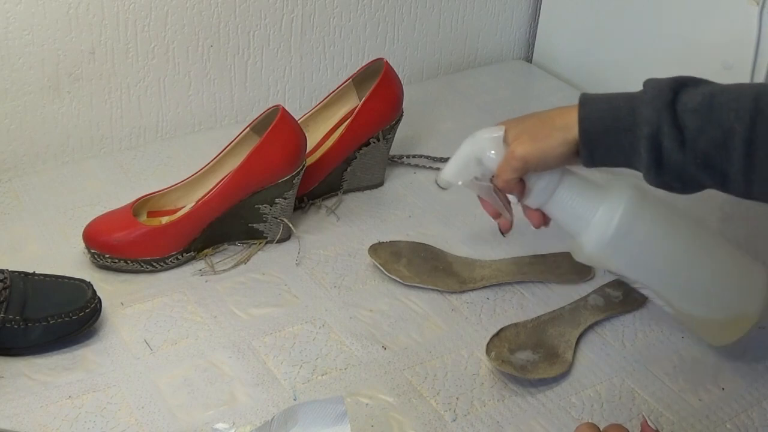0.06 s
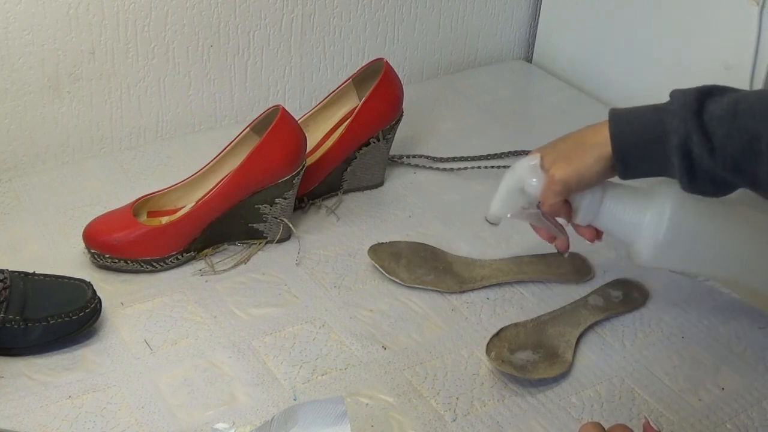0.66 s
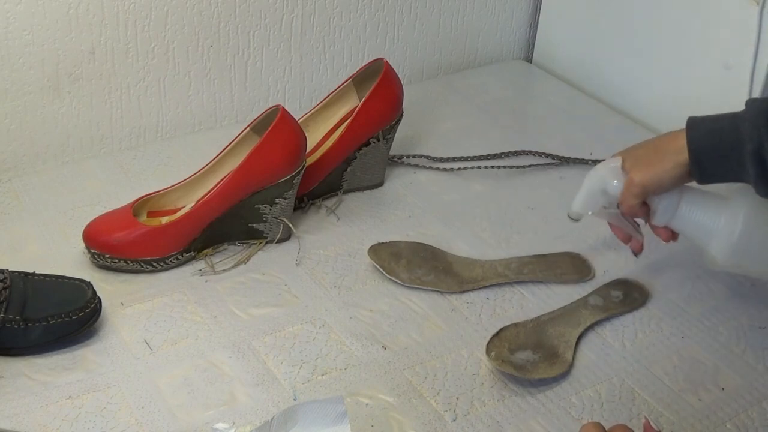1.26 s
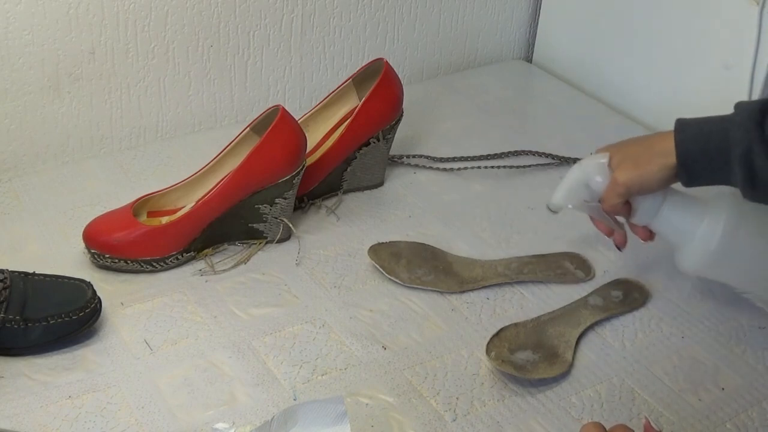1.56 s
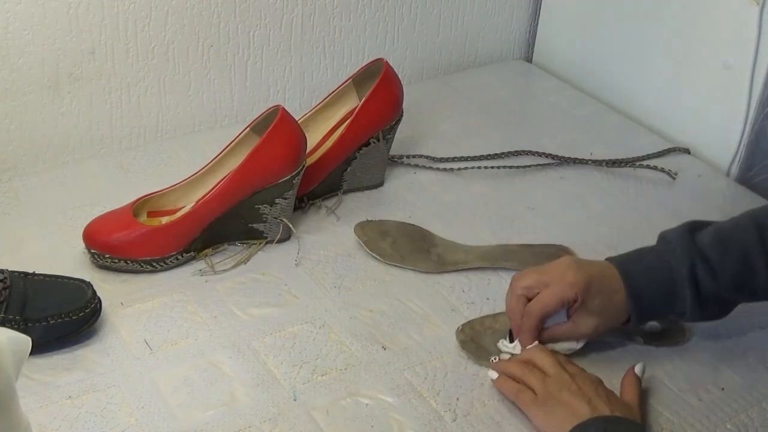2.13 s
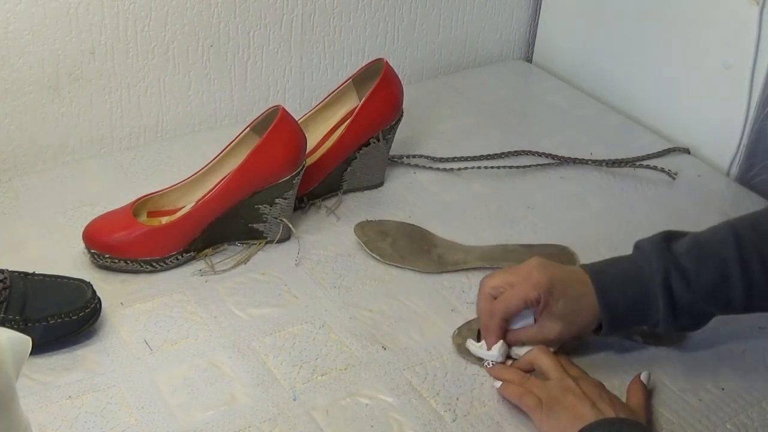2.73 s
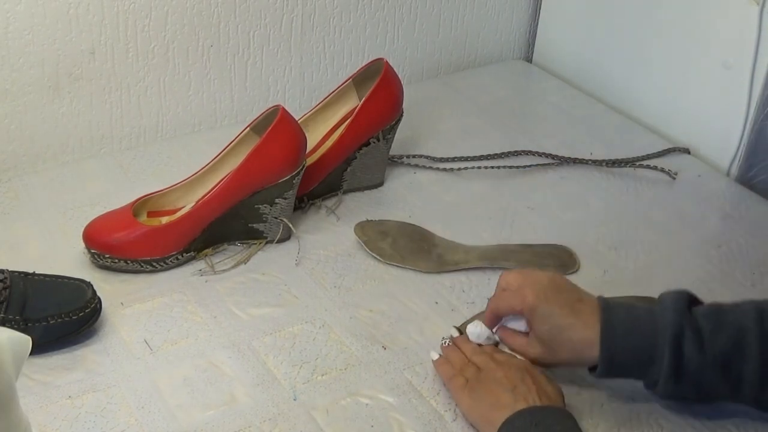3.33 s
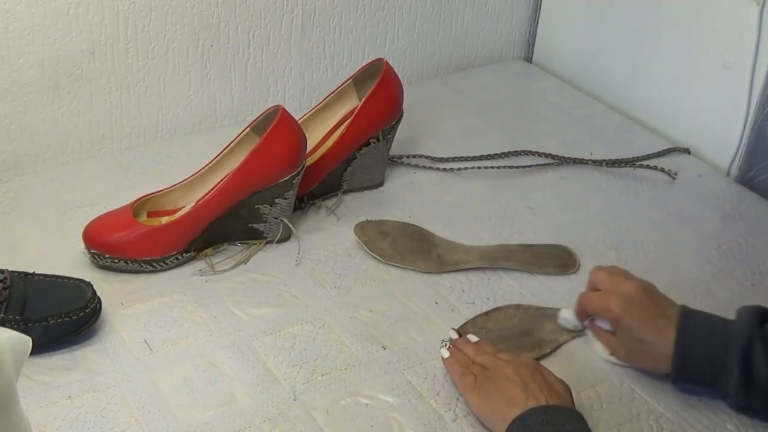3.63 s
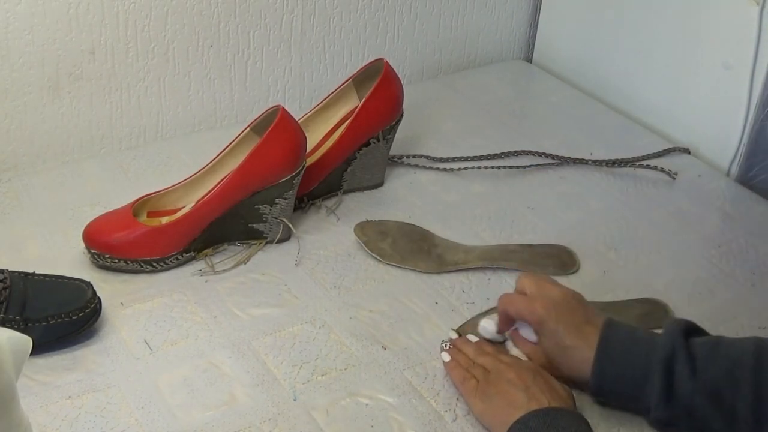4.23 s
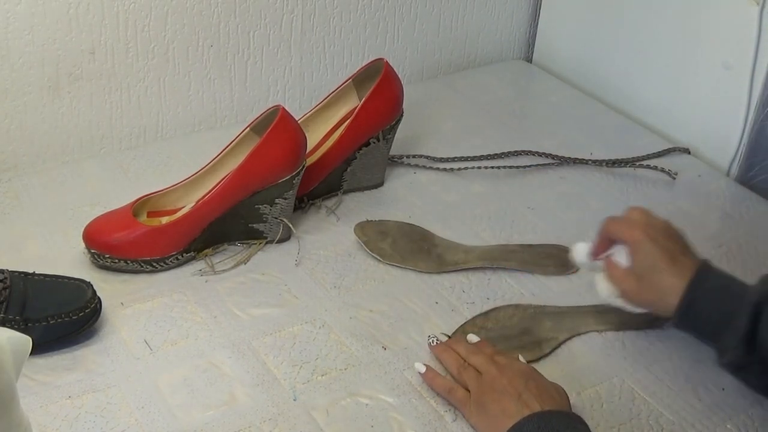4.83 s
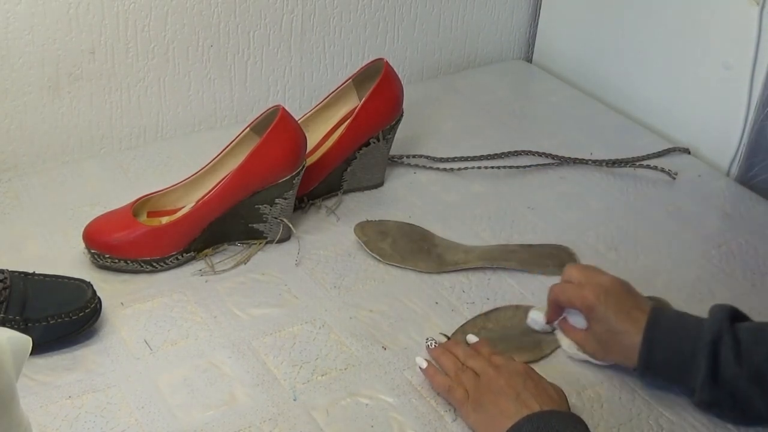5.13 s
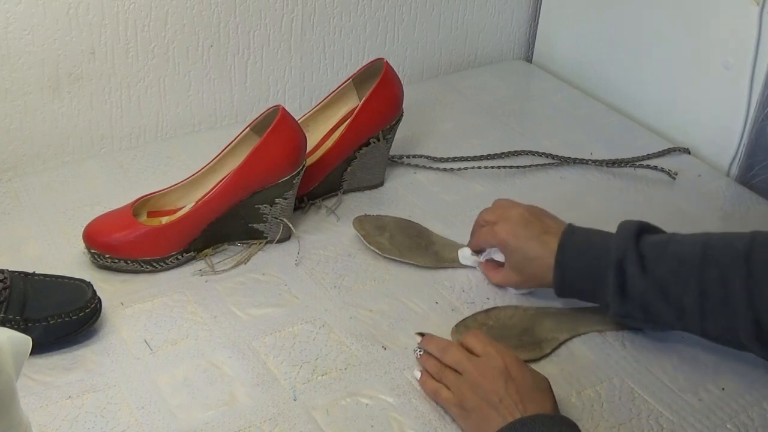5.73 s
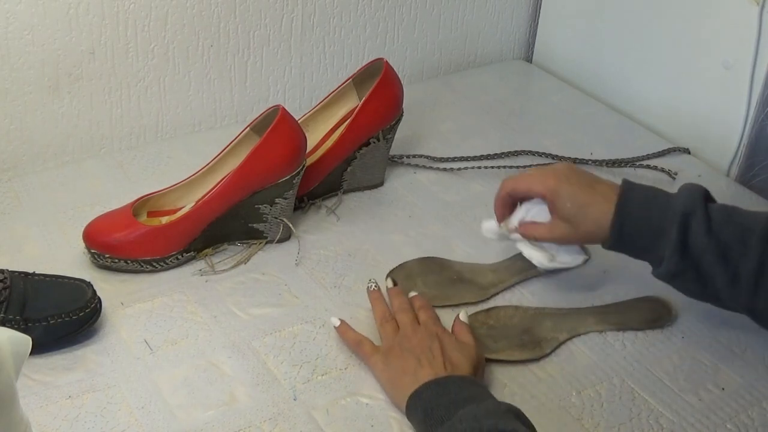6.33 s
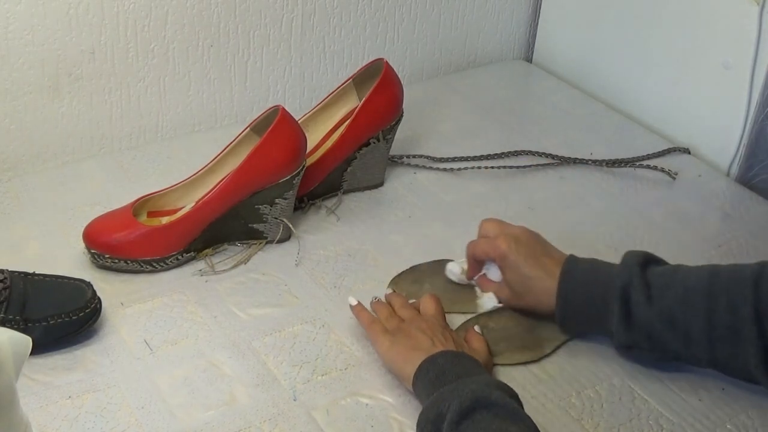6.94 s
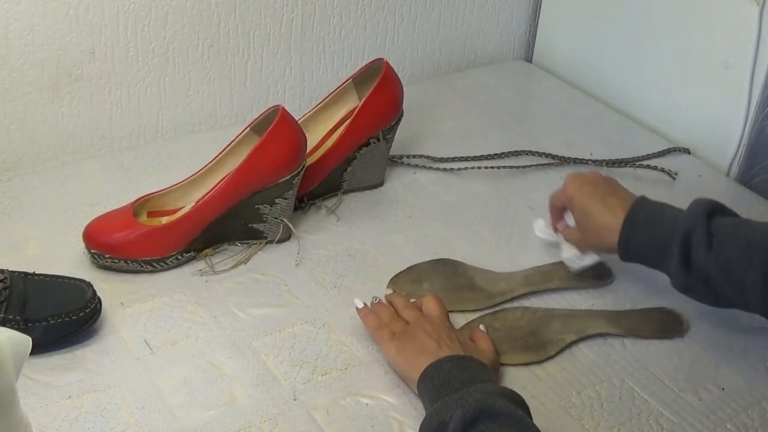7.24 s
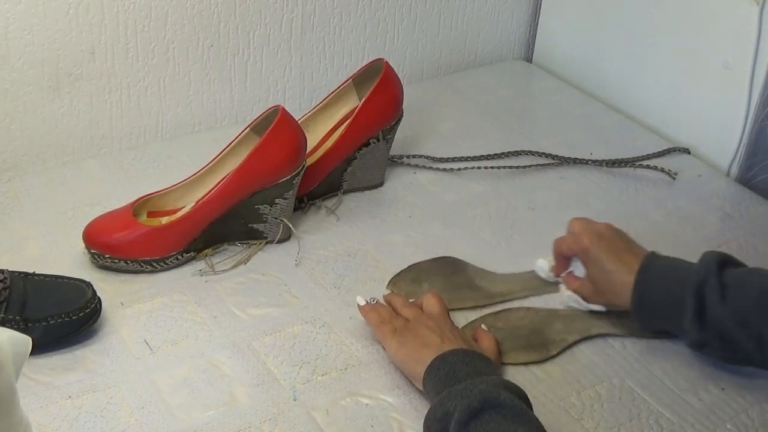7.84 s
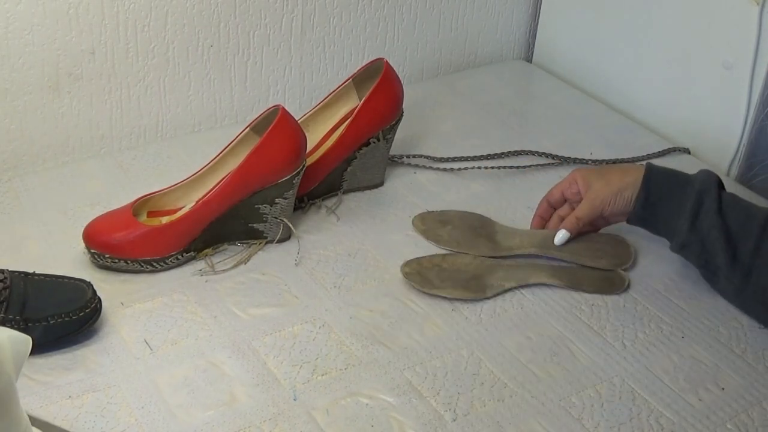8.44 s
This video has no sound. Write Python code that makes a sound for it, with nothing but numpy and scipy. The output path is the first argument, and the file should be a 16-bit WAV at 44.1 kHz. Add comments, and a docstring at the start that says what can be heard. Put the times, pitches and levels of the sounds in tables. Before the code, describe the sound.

Quick clicking, hissing squirts from a trigger bottle stop abruptly, followed by soft strokes of a cloth rubbing insoles.

```python
"""In a small, softly hushing room, a plastic trigger bottle is pumped quickly over two insoles on a table.
Each pull shakes the piston, ticks the valve and throws a hiss of mist; then the trigger snaps back.
At 1.8 s the spraying stops abruptly. A cloth is patted down on the insoles and wiped along them,
its fibres catching and letting go. At 7.9 s that stops too, and a fingernail nudges the insoles,
which slide with a faint squeak. A very faint, high pip repeats from start to end."""
import sys
import numpy as np
from scipy import signal
from scipy.fft import rfft, irfft, next_fast_len
from scipy.io import wavfile
from scipy.ndimage import uniform_filter1d, map_coordinates

SR = 44100
rng = np.random.default_rng(int(sys.argv[2]) if len(sys.argv) > 2 else 0)


def log_audio(samples):
    """Write samples as a 16-bit WAV file to the path given in sys.argv[1]."""
    # one column per channel
    frames = np.atleast_2d(samples).T
    # limit to full scale, then quantise
    limited = np.clip(frames, -1, 1)
    pcm = np.round(limited * 32767).astype(np.int16)
    wavfile.write(sys.argv[1], SR, pcm)


N = 382788
TIME = np.arange(N) / SR
RING_TIME = np.arange(SR // 3) / SR  # seconds since a hit
SWITCH_S = (1.8295, 7.937)  # spraying gives way to wiping; wiping stops

# tone of the room's hush (a "colour" says how strong each frequency is): f/Hz, level/dB
HUSH_COLOUR = [(15, -46), (25, -25), (64, -6.5), (161, -7), (309, -3.5), (344, -8), (641, -7), (887, -7.5),
               (1400, -12.5), (3430, -10.5), (3720, -27), (4030, -13.5), (16000, -24.5)]
# how long the room's echo takes to fade by 60 dB: f/Hz, fade/s
ROOM_FADE = [(100, 0.068), (500, 0.21), (2000, 0.28), (6000, 0.15), (14000, 0.049)]
# gain on the difference between left and right: f/Hz, level/dB
STEREO_WIDTH = [(60, -7.5), (300, 2), (700, 2.5), (1400, 2), (3300, -4), (6500, 1), (9800, 2), (12000, -29),
                (16000, -11)]

# small touches of nails, plastic and insoles: t/s, level/dB, f/Hz, fade/s
TAPS = [(1.739, -39.5, 2840, 0.014), (1.82, -30.5, 4330, 0.0029), (2.423, -38.5, 5160, 0.0041),
        (3.4537, -31.5, 5200, 0.00066), (4.1355, -34, 3860, 0.00082), (5.635, -29.5, 4170, 0.00053),
        (6.013, -45.5, 1130, 0.0033), (6.095, -55, 1040, 0.055), (6.616, -47, 4480, 0.0079),
        (7.489, -47, 6460, 0.018), (8.228, -39, 4400, 0.00047), (8.326, -47, 3370, 0.0013),
        (8.584, -61, 8500, .005)]
# loudness of the sliding insole: t/s, level/dB
SLIDE_LEVEL = [(8.33, -86), (8.38, -58), (8.41, -64), (8.46, -81), (8.53, -74), (8.6, -91)]
# tone of its scrape: f/Hz, level/dB
SLIDE_COLOUR = [(300, -4), (700, -8), (1500, -7), (3000, 2), (4500, -9), (9000, -27)]
# where the scrape rings: f/Hz, width/Hz, boost/dB
SLIDE_PEAKS = [(650, 200, 9), (2900, 300, 11)]
# its squeak: t/s, f/Hz, level/dB
SQUEAK = [(8.36, 2040, -85), (8.4, 2050, -61), (8.46, 2170, -69), (8.52, 2220, -69), (8.57, 2260, -87)]

# the hand lands or presses with the cloth: t/s, level/dB, hardness/dB
PATS = [(2.0903, -30.5, 1.5), (2.339, -45.5, 2), (2.878, -44.5, -6), (2.949, -47, 2.5), (3.263, -55, -21),
        (3.828, -51.5, -9), (4.14, -36.5, -1), (4.9938, -29.5, 3), (5.636, -51, -1), (5.662, -47.5, -5),
        (6.639, -46.5, -17), (6.679, -47.5, -10), (7.068, -53, -22), (7.18, -49.5, -21), (7.512, -36.5, -4),
        (7.553, -42.5, -1.5), (7.758, -52, -16)]
# tone of a pat: f/Hz, level/dB
PAT_COLOUR = [(60, -14), (500, -8), (1200, -14), (2000, -15.5), (3000, -16.5), (5000, -24.5), (12000, -45)]
# notes the table top rings at: f/Hz, level/dB, fade/s
TABLE_NOTES = [(88.6, -2, 0.21), (119, -4.5, 0.2), (175, -10.5, 0.25), (214.4, -9, 0.27),
               (261, -2.5, 0.091), (294.5, -3, 0.14), (406, -2.5, 0.12), (471, -7.5, 0.15),
               (585, 8.5, 0.066), (705, -5.5, 0.13), (883, -1.5, 0.096), (1208, -6, 0.11)]
# wipes: start/s, stop/s, speeding up/s, slowing down/s, level/dB, easing off/(dB per s), drag/dB
WIPES = [(2.125, 2.418, 0.21, 0.17, -33, 0, -55.5), (2.732, 2.921, .12, 0.14, -34, 0, -52),
         (3.392, 3.838, 0.16, 0.071, -36, 6.5, -58), (4.153, 4.446, 0.15, 0.22, -35.5, 0, -54),
         (4.38, 4.709, 0.15, 0.073, -37.5, 2, -61), (4.984, 5.387, 0.13, 0.055, -38.5, 28, -66),
         (6.701, 7.265, 0.28, 0.095, -36.5, 33.5, -62), (7.504, 8.0, 0.16, .06, -37, 7, -65)]
# light brushes of cloth and sleeve: middle t/s, half length/s, level/dB
BRUSHES = [(1.87, .04, -51), (1.914, 0.014, -45.5), (1.996, 0.035, -50), (2.085, 0.026, -43),
           (2.668, 0.012, -48), (2.933, 0.013, -44.5), (3.047, 0.19, -53.5), (3.336, 0.018, -45.5),
           (3.927, .03, -49), (4.015, 0.017, -47.5), (4.075, .015, -52), (4.142, 0.0086, -40),
           (4.76, 0.027, -58.5), (5.435, 0.031, -50.5), (5.504, 0.026, -46), (5.74, 0.11, -50),
           (5.958, 0.082, -54.5), (6.144, 0.068, -50.5), (6.42, 0.098, -59), (6.62, 0.016, -47),
           (6.786, 0.022, -45), (7.498, .014, -48)]
# tone of the rubbing cloth: f/Hz, level/dB
CLOTH_COLOUR = [(120, -40), (200, -13), (294, -12.5), (347, -31), (465, -13.5), (601, -5), (647, -8),
                (899, -3), (968, -3), (1650, -3.5), (2330, -3.5), (4270, 1), (8580, -5.5), (11500, -13),
                (16000, -36)]
# where the rubbed insole rings: f/Hz, width/Hz, boost/dB
INSOLE_PEAKS = [(1680, 400, 1), (3050, 860, 2.5)]
# rumble of the hand dragging on the table: f/Hz, level/dB
DRAG_COLOUR = [(30, -14), (60, -8.5), (95, 0), (140, -11.5), (260, -11), (500, -12), (1200, -25.5)]

# trigger pulls: start t/s, piston hits bottom t/s, mist level/dB, knock level/dB
PULLS = [(-.14, -.083, -27.5, -30), (0.1659, 0.2233, -29, -25), (0.468, 0.527, -29.5, -23.5),
         (0.76, .818, -29, -25), (1.034, 1.111, -29.5, -24.5), (1.307, 1.385, -30, -26.5),
         (1.585, 1.6222, -30, -23.5)]
# the trigger snaps back after each pull: t/s, level/dB
SNAPS = [(0.025, -20), (0.3604, -20), (0.6567, -18.5), (0.9399, -16.5), (1.2056, -17.5), (1.4748, -16.5),
         (1.768, -20.5)]
# the valve shuts and bounces once: t/s after the snap, level/dB
VALVE_SHUTS = [(0.0118, -24.5), (0.031, -28.5)]
# mist at full pressure: f/Hz, level/dB
FULL_MIST = [(60, -63), (115, 6), (180, -14.5), (300, 0.5), (700, -24), (1400, -12), (2700, -11.5),
             (4400, -4), (6000, -3.5), (8200, 0), (10000, -1), (12500, -8.5), (16000, -12.5)]
# mist as the pressure sags: f/Hz, level/dB
LATE_MIST = [(60, -53), (115, -28), (400, -14.5), (1400, -15), (2700, -7), (4500, -2), (6000, -1.5),
             (8200, 0.5), (11000, -3), (12500, -8.5), (16000, -16)]
# where the nozzle rings: f/Hz, width/Hz, boost/dB
NOZZLE_PEAKS = [(4430, 120, 7.5), (8340, 170, 2.5), (9750, 500, 1.5), (10900, 170, -3)]
# notes of the half-full bottle and its spray head: f/Hz, level/dB, fade/s
BOTTLE_NOTES = [(106.7, -26, 0.44), (284, -8.5, 0.15), (387, -12.5, 0.22), (440, -8, 0.08),
                (490, -16, 0.16), (552, -7.5, 0.097), (645, -15, 0.16), (739.5, -6, 0.1),
                (887, -13.5, 0.12), (983, -13.5, 0.1), (1138, -6, 0.031), (1540, -7, 0.022),
                (2032, -4.5, 0.031), (2210, -4.5, 0.032)]
# notes of the trigger and its spring: f/Hz, level/dB, fade/s
SPRING_NOTES = [(1920, -2, 0.026), (2164, 3.5, 0.029), (2254, -7.5, 0.05), (2264, -16, 0.038)]
# tone of the piston's clatter: f/Hz, level/dB
CLATTER_COLOUR = [(60, -33), (200, -13), (450, -3.5), (950, -3), (1500, -18), (2200, -11.5), (3000, -20),
                  (8000, -34)]
# tone of the trigger's snap: f/Hz, level/dB
SNAP_COLOUR = [(200, -23), (1200, -3), (2200, -1), (3500, 2), (5500, -1), (7200, 1.5), (10000, -6.5),
               (12500, -15), (16000, -23)]
# tone of the valve's tick: f/Hz, level/dB
TICK_COLOUR = [(300, -2.5), (3000, -7.5), (5200, -3), (6700, -1), (8700, 2.5), (10800, -7.5), (12300, -8.5),
               (16000, -25)]


def amp(db):
    """Turns decibels into a number to multiply by."""
    return 10 ** (np.asarray(db) / 20)


def unit(x):
    """Scales a signal to an average power of 1."""
    return x / np.sqrt(np.mean(x ** 2) + 1e-20)


def read(points, hz):
    """Looks up a table by frequency, joining its points on a scale of octaves."""
    f, value = np.transpose(points)
    return np.interp(np.log(hz + 1), np.log(f + 1), value)


def curve(rows, column=1):
    """Follows one column of a table through time."""
    rows = np.array(rows)
    return np.interp(TIME, rows[:, 0], rows[:, column])


def add(mix, s, sound):
    """Mixes a sound in at s seconds."""
    at = round(s * SR)
    sound = sound[max(-at, 0):]
    part = mix[max(at, 0):][:len(sound)]
    part += sound[:len(part)]


def colour(x, points, peaks=(), size=4096):
    """Gives a sound a tone and ringing peaks; plain noise keeps its power."""
    f = abs(np.fft.fftfreq(size, 1 / SR))
    peaks_db = sum(db / (1 + (2 * (f - hz) / width) ** 2) for hz, width, db in peaks)
    log_gain = np.log(unit(amp(read(points, f) + peaks_db)) + 1e-6)
    response = np.fft.ifft(np.exp(np.conj(signal.hilbert(log_gain)))).real  # rings only after a hit
    return signal.oaconvolve(x, response[:size // 2])[:len(x)]


def wander(rate_hz):
    """A smooth random wobble, up to about this fast."""
    size = next_fast_len(N)
    spectrum = rfft(rng.standard_normal(size)) / (1 + (np.fft.rfftfreq(size, 1 / SR) / rate_hz) ** 4)
    return unit(irfft(spectrum, size)[:N])


def grains(per_s, spread_db):
    """A rain of tiny clicks, a few much louder than the rest."""
    size = amp(spread_db * np.minimum(rng.exponential(1, N), 5))
    return unit(size * rng.choice([-1, 1], N) * (rng.random(N) < per_s / SR))


def ring(notes, scatter_db, rise_s, tilt_db=0, detune=0):
    """A struck object's fading notes; tilt_db per octave favours the high ones."""
    hz, db, fade_s = np.transpose(notes)[:, :, None]
    sign = rng.choice([-1, 1], hz.shape)
    uneven, shift = rng.standard_normal((2, *hz.shape))
    usual = amp(db + tilt_db * np.log2(hz / np.median(hz)))
    gain = usual * amp(scatter_db * np.tanh(uneven))
    gain *= np.sqrt((usual ** 2 * fade_s).sum() / (gain ** 2 * fade_s).sum())  # same energy, shared anew
    fade = np.exp(-np.log(1000) * RING_TIME / fade_s)
    waves = sign * gain * fade * np.sin(2 * np.pi * hz * (1 + detune * shift) * RING_TIME)
    return waves.sum(0) * (1 - np.exp(-RING_TIME / rise_s))


def crack(points, fall_s, tail_db, tail_s):
    """A sharp hit and the quickly dying chatter after it."""
    level = np.exp(-RING_TIME / fall_s) + amp(tail_db) * np.exp(-RING_TIME / tail_s)
    return colour(level * rng.choice([-1, 1], len(RING_TIME)), points)


def patchy(x, depth_db, size=4):
    """Makes narrow bands of frequency swell and fade for a few hundredths of a second each."""
    bands = signal.stft(x, SR, nperseg=512)[2]
    patches = uniform_filter1d(rng.standard_normal(bands.shape), size, axis=0)
    patches = unit(uniform_filter1d(patches, size, axis=1))
    return signal.istft(bands * amp(depth_db * patches), SR, nperseg=512)[1][:N]


def table_echo(x, delay_s, sway_s, echo_db):
    """The echo off the table shifts as the hand moves, so the tone shifts too."""
    lag = (delay_s + sway_s * wander(1.56)) * SR
    return x + amp(echo_db) * map_coordinates(x, [np.arange(N) - lag], order=3)


def room(x, echo_db):
    """The nearby walls echo first; a short blur follows, different on the left and right."""
    early_boost = 1 + 2 * np.exp(-RING_TIME / 0.0039)
    echoes = rng.standard_normal((2, len(RING_TIME))) * (RING_TIME > .003) * early_boost
    hz, t, bands = signal.stft(echoes, SR, nperseg=256)
    fade = np.exp(-np.log(1000) * t / read(ROOM_FADE, hz)[:, None])
    tail = signal.istft(bands * fade, SR, nperseg=256)[1][:, :len(RING_TIME)]
    tail /= np.linalg.norm(tail[0])
    return x + amp(echo_db) * signal.fftconvolve(x[None], tail, axes=1)[:, :N]


def background(hush_db=-62.5, side_db=-7, pip_hz=3780, pip_db=-59, pip_s=0.0032, gap_s=.04):
    """The room's quiet hush and a faint, evenly repeating electronic pip."""
    middle, side = (colour(rng.standard_normal(N), HUSH_COLOUR) for _ in range(2))
    hush = amp(hush_db) * (middle + amp(side_db) * np.array([side, -side]))
    from_pip_s = (TIME + .011) % gap_s - gap_s / 2
    pip_level = amp(pip_db + 4 * wander(16)) * np.exp(-(from_pip_s / pip_s) ** 2)
    return hush + pip_level * np.sin(2 * np.pi * pip_hz * TIME + wander(50))


def handling():
    """Light dry taps, and an insole that scrapes and squeaks as it is pushed along the table."""
    scrape = colour(grains(5000, 2.7), SLIDE_COLOUR, SLIDE_PEAKS) * amp(curve(SLIDE_LEVEL))
    cycles = np.cumsum(curve(SQUEAK) * (1 + 0.013 * wander(120))) / SR
    squeak = amp(curve(SQUEAK, column=2) + 2.8 * wander(60)) * np.sin(2 * np.pi * cycles)
    out = (scrape + squeak) * (TIME > SLIDE_LEVEL[0][0])
    for s, db, hz, fall_s in TAPS:
        band = [(hz / 8, -16), (hz / 2, -7), (hz, 0), (hz * 2, -14), (hz * 4, -30)]
        add(out, s, amp(db) * crack(band, fall_s, tail_db=-10, tail_s=0.0096))
    return out


def pats():
    """The padded hand lands and the table booms; a soft press builds more slowly and sounds duller."""
    out = np.zeros(N)
    for s, db, hard_db in PATS:
        slap = amp(hard_db + 0.5) * crack(PAT_COLOUR, fall_s=0.0069, tail_db=-18.5, tail_s=0.046)
        boom = ring(TABLE_NOTES, scatter_db=2.5, rise_s=0.009, tilt_db=0.29 * hard_db, detune=0.01)
        cushion = 1 - np.exp(-RING_TIME * amp(hard_db) / 0.00072)
        add(out, s, amp(db) * cushion * (slap + amp(-14.5) * unit(boom)))
    return out


def hand_motion(sleeve_db=-61.5, lean_db=-66, ends_db=16, brush_tilt_db=1.1, fast_tilt_db=1.6):
    """Wipes speed up, hold and slow down. Gives rubbing level, brightness (dB per octave) and drag."""
    power = amp(sleeve_db) ** 2  # the sleeve never quite rests
    for s, half_s, db in BRUSHES:
        power += amp(db) ** 2 * np.exp(-((TIME - s) / half_s) ** 2)
    tilt = brush_tilt_db * power
    drag = amp(lean_db) ** 2  # the other hand leans on the table
    for start, stop, rise_s, fall_s, db, easing_db, drag_db in WIPES:
        early = np.maximum(1 - (TIME - start) / rise_s, 0)
        late = np.maximum(1 - (stop - TIME) / fall_s, 0)
        slow_db = ends_db * (early ** 1.95 + late ** 1.95)  # quieter at both ends
        eased_db = easing_db * np.clip(TIME - start - rise_s, 0, stop - start)
        wipe = amp(db - slow_db - eased_db) ** 2
        power += wipe
        tilt += wipe * (fast_tilt_db - 0.18 * slow_db)
        drag += amp(drag_db - 0.65 * slow_db) ** 2
    return np.sqrt(power), tilt / power, np.sqrt(drag)


def cloth(pivot_hz=4500):
    """Fibres catch and let go on the insole, brighter when fast; the hand's weight drags on the table."""
    level, tilt, drag = hand_motion()
    fibres = colour(grains(30000, 2.4), CLOTH_COLOUR, INSOLE_PEAKS)
    hz, t, bands = signal.stft(fibres, SR, nperseg=512)
    octaves = np.clip(np.log2((hz + 1) / pivot_hz), -2, 2)[:, None]
    rub = signal.istft(bands * amp(octaves * np.interp(t, TIME, tilt)), SR, nperseg=512)[1][:N]
    rub *= level * amp(0.94 * wander(54) + 0.3 * wander(10.4) - 0.78)
    rub = table_echo(rub, delay_s=0.00058, sway_s=0.00016, echo_db=-13.5)
    rumble = colour(rng.standard_normal(N), DRAG_COLOUR) * drag * amp(2.4 * wander(3.2) + 0.5)
    return rub + rumble


def squelch_and_cutoff_thump(at_s=1.702, hz=880, db=-35, thump_s=1.8235, thump_hz=100, thump_db=-35):
    """A short squelch on the last pull; a low thump as the sound cuts off abruptly."""
    out = np.zeros(N)
    burst = np.exp(-(RING_TIME / .012) ** 4) * rng.choice([-1, 1], len(RING_TIME))
    band = [(hz / 4, -20), (hz / 2, -7), (hz, 0), (hz * 2, -30), (hz * 4, -50)]
    add(out, at_s, amp(db) * colour(burst, band, [(hz, 400, 4)]))
    half_wave = np.sin(2 * np.pi * thump_hz * RING_TIME) * (RING_TIME * thump_hz < .5)
    add(out, thump_s, amp(thump_db) * half_wave)
    return out


def mist(rise_s=0.049, swell_db=18, sag_db=9.5, sag_s=0.057, let_go_s=0.014, close_s=0.033):
    """The nozzle hisses as pressure builds, sags, and dies when the finger lets go before the snap."""
    full, late = np.zeros(N), np.zeros(N)
    for (start, _, db, _), (snap_s, _) in zip(PULLS, SNAPS):
        age = np.maximum(TIME - start, 0)
        spent = 1 - np.exp(-(np.maximum(age - rise_s, 0) / sag_s) ** 2)
        level = amp(db - swell_db * np.maximum(1 - age / rise_s, 0) - sag_db * spent)
        level *= (TIME > start) * np.exp(-np.maximum(TIME - snap_s + let_go_s, 0) / close_s)
        full += level * np.sqrt(1 - spent)
        late += level * np.sqrt(spent)
    hiss = full * colour(grains(16000, 3.4), FULL_MIST, NOZZLE_PEAKS)
    hiss += late * colour(grains(14000, 1.8), LATE_MIST, NOZZLE_PEAKS)
    hiss = patchy(hiss, depth_db=2.5) * amp(1.3 * wander(150) - 1.2)  # the jet sputters
    return table_echo(hiss, delay_s=0.000731, sway_s=.00012, echo_db=-13)


def valve_tick():
    """The small bright click of the valve."""
    return crack(TICK_COLOUR, fall_s=0.00068, tail_db=-5.5, tail_s=0.0056)


def piston_knock(tilt_db):
    """One slip of the piston knocks the bottle; the sloshing liquid retunes it each time."""
    body = ring(BOTTLE_NOTES, scatter_db=2.5, rise_s=0.0015, tilt_db=tilt_db, detune=0.0097)
    clatter = crack(CLATTER_COLOUR, fall_s=0.0013, tail_db=-11, tail_s=0.022)
    return amp(-5) * body + amp(-7) * clatter


def trigger_snap():
    """The returning trigger cracks against its stop and rings the bottle and the spring."""
    stop = crack(SNAP_COLOUR, fall_s=0.0011, tail_db=-11, tail_s=0.017)
    body = ring(BOTTLE_NOTES, scatter_db=4.5, rise_s=0.0034, detune=0.0085)
    spring = ring(SPRING_NOTES, scatter_db=7, rise_s=0.00029)
    return amp(-1.5) * stop + amp(-9) * body + amp(-7) * spring


def trigger_pulls(open_s=.0085, open_db=-27, slips=3, slip_gap_s=.018):
    """The piston knocks, the valve ticks just after, and the piston jerks on and hits bottom.
    Then the trigger snaps back and the valve shuts."""
    out = np.zeros(N)
    for (start, bottom_s, _, knock_db), (snap_s, snap_db) in zip(PULLS, SNAPS):
        add(out, start + open_s, amp(open_db) * valve_tick())
        for slip in range(slips):
            add(out, start + slip * slip_gap_s, amp(knock_db) * piston_knock(tilt_db=0.6))
        add(out, bottom_s, amp(knock_db + 1.5) * piston_knock(tilt_db=2.5))  # the last knock is harder
        add(out, snap_s, amp(snap_db) * trigger_snap())
        for delay_s, db in VALVE_SHUTS:
            add(out, snap_s + delay_s, amp(db) * valve_tick())
    return out


def scene():
    """Spraying, then wiping, then nudging, over the room's hush; the right side is a touch louder."""
    spraying = room(mist(), echo_db=-16) + room(trigger_pulls() + squelch_and_cutoff_thump(), echo_db=-14)
    wiping = room(cloth(), echo_db=-12) + room(pats(), echo_db=-17)
    stage = np.searchsorted(SWITCH_S, TIME)
    sound = spraying * (stage == 0) + wiping * (stage == 1) + room(handling(), echo_db=-12)
    return (sound + background()) * amp([[-.2], [.2]])


def record(dry, top_hz=15800):
    """Two close microphones hear the bass and top treble much alike, and lose sound above top_hz."""
    middle, side = (dry[0] + dry[1]) / 2, (dry[0] - dry[1]) / 2
    side = irfft(rfft(side) * amp(read(STEREO_WIDTH, np.fft.rfftfreq(N, 1 / SR))), N)
    pair = np.array([middle + side, middle - side])
    low_pass = signal.firwin(511, top_hz, window=("kaiser", 9), fs=SR)
    return signal.oaconvolve(pair, low_pass[None], "same")


dry = scene()
out = record(dry)
log_audio(out)
```